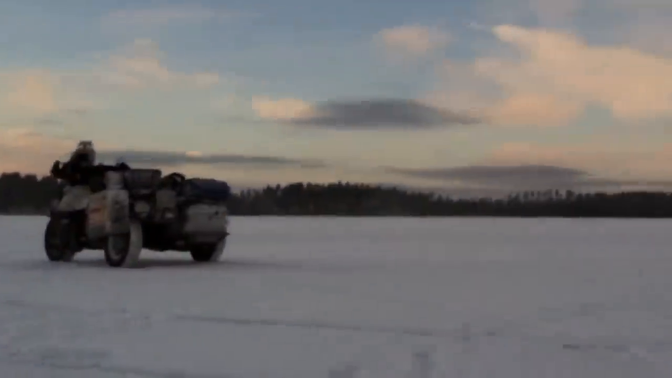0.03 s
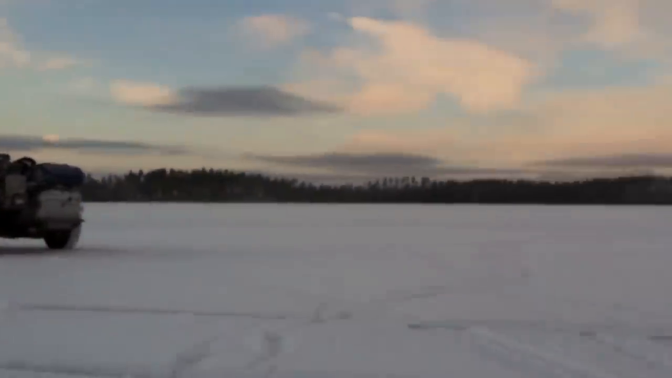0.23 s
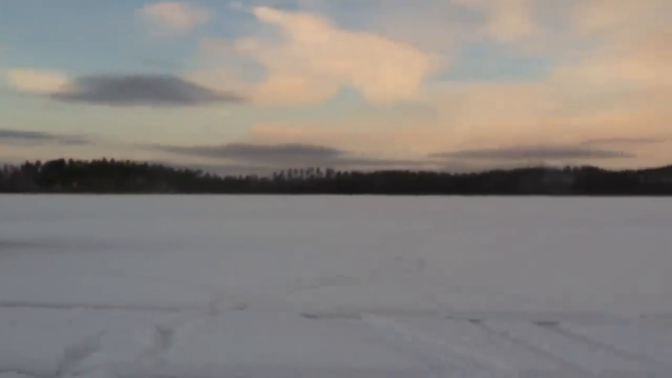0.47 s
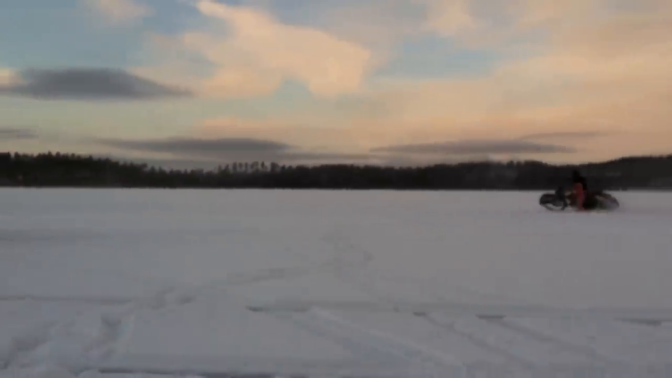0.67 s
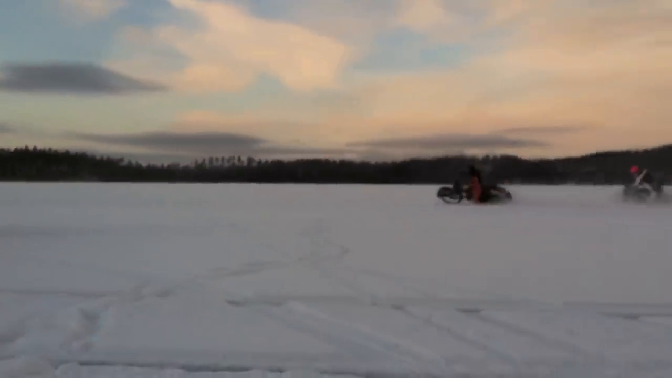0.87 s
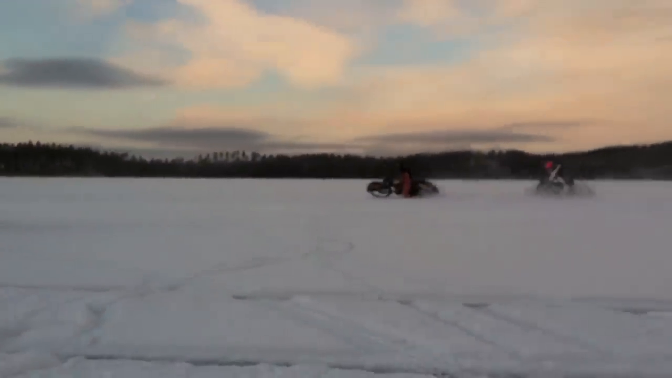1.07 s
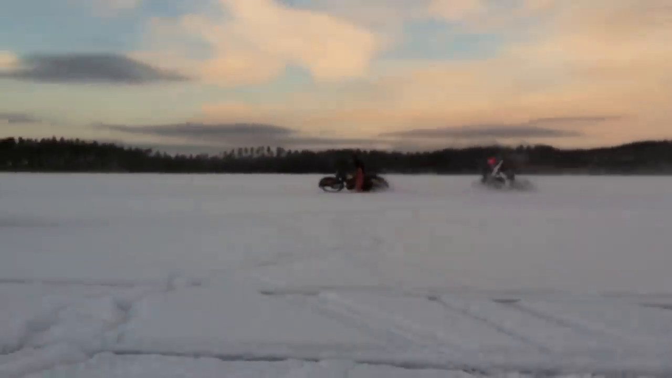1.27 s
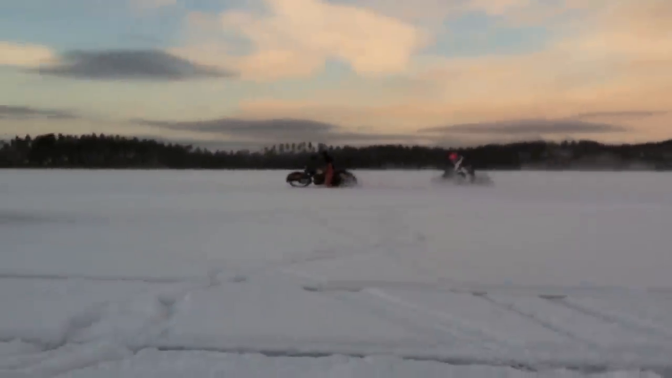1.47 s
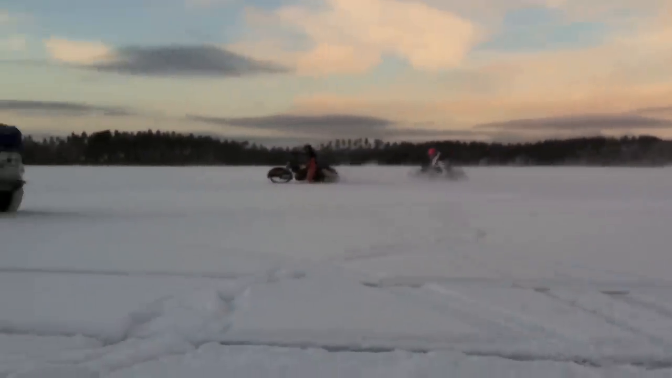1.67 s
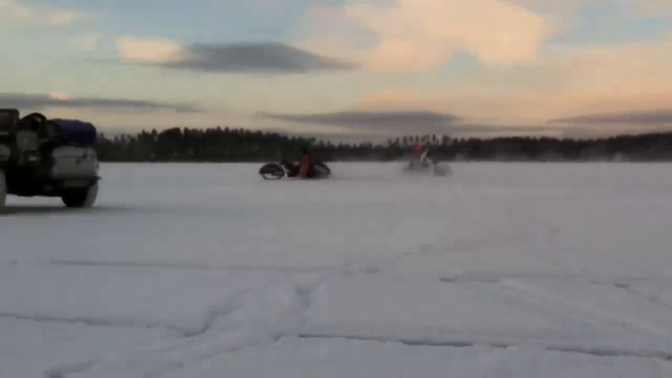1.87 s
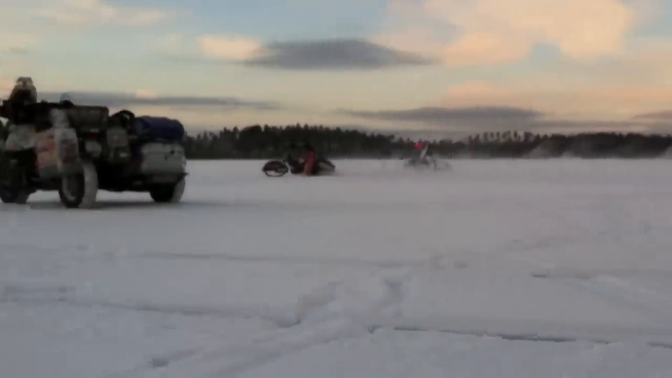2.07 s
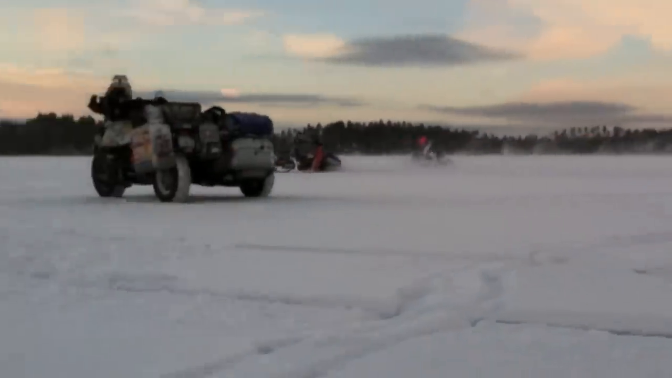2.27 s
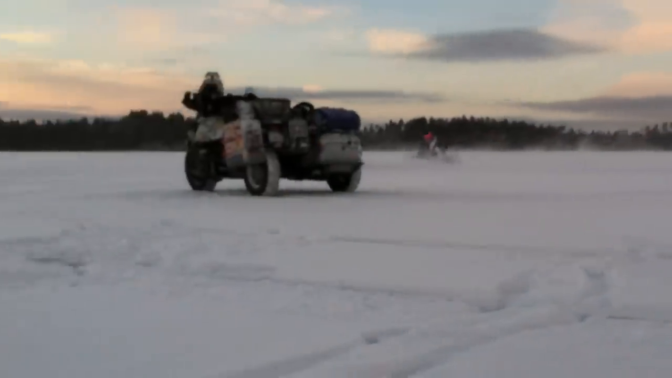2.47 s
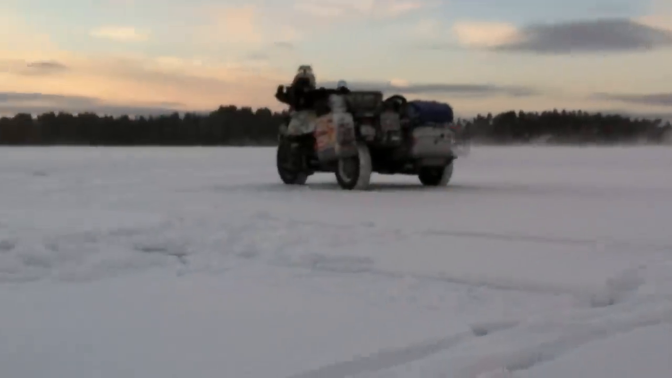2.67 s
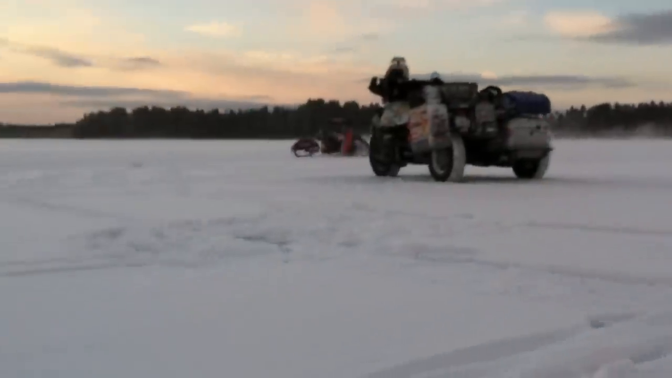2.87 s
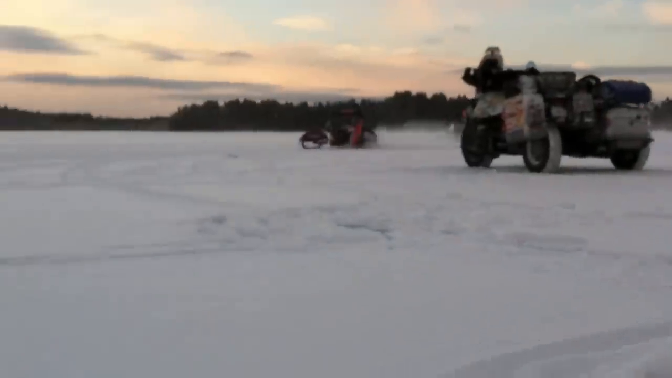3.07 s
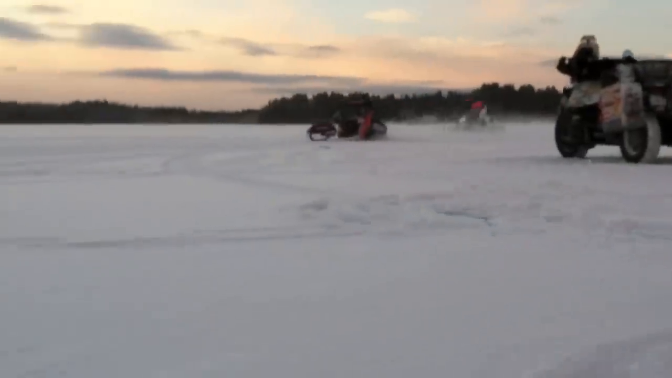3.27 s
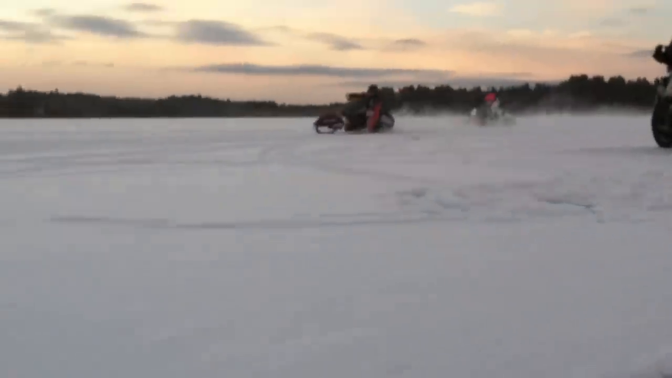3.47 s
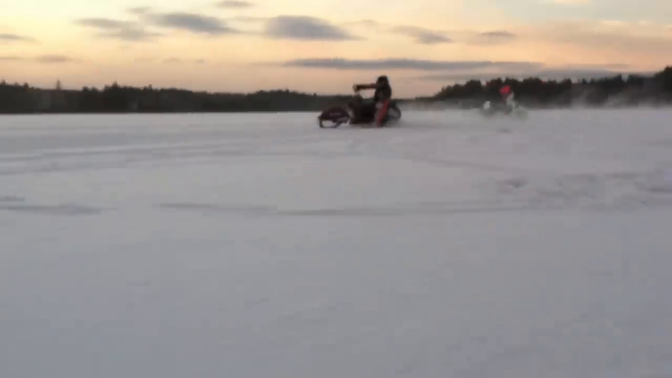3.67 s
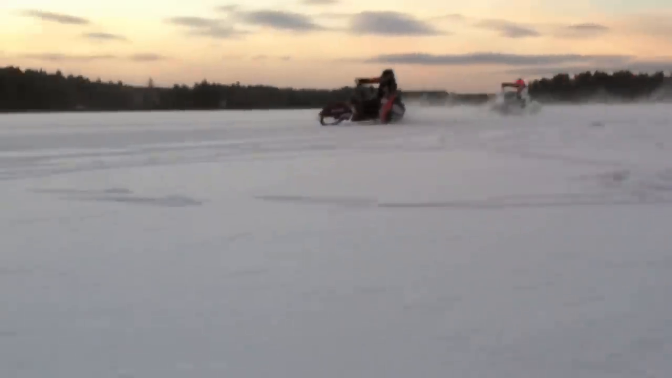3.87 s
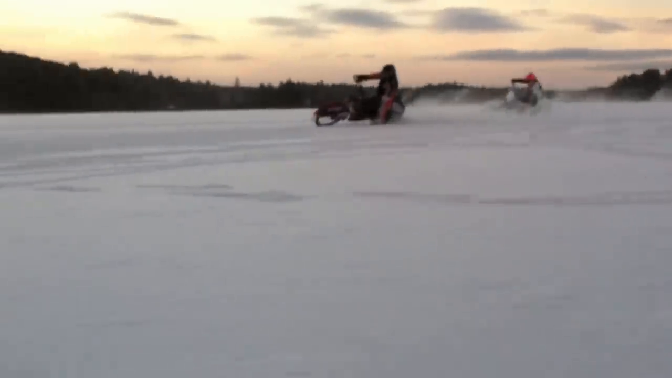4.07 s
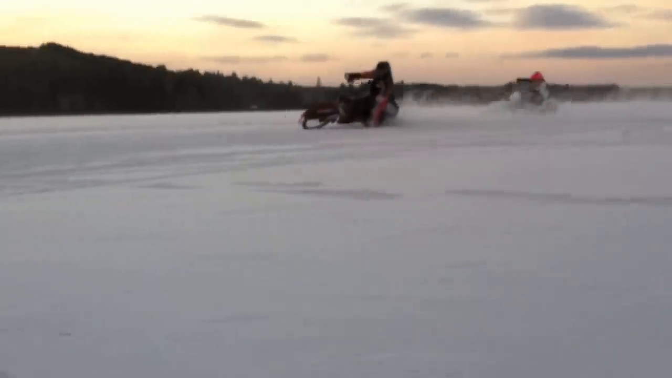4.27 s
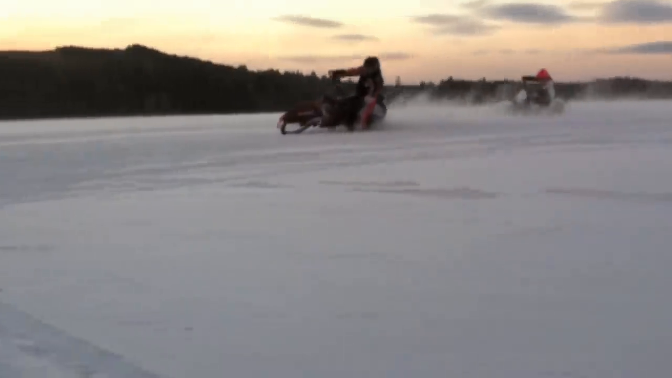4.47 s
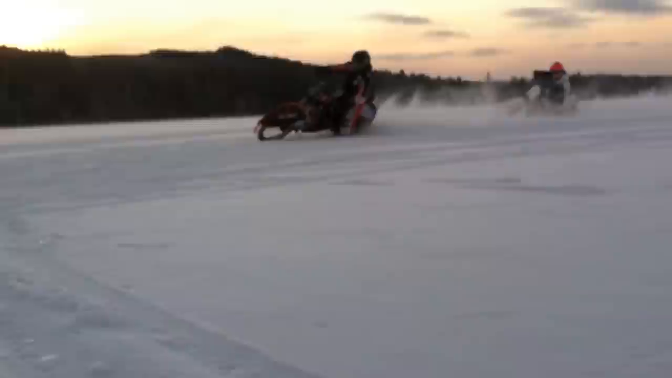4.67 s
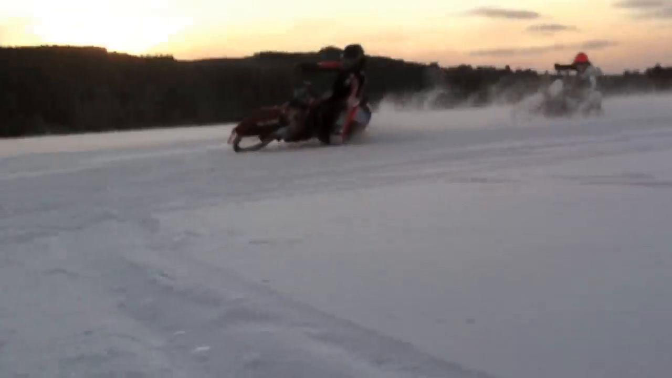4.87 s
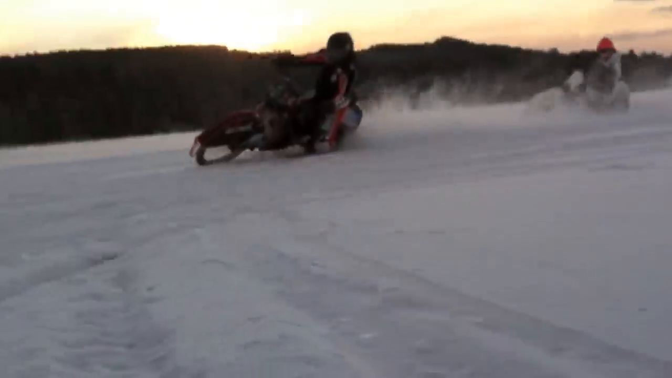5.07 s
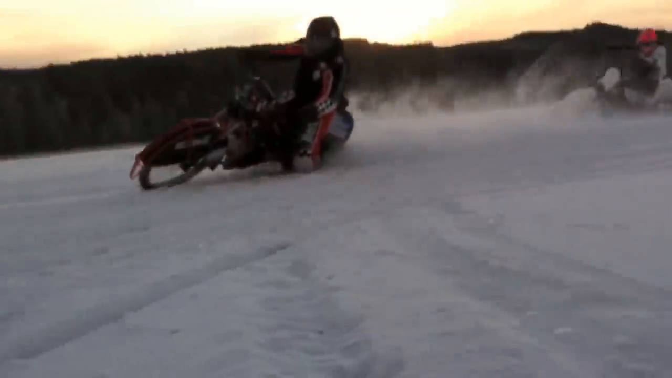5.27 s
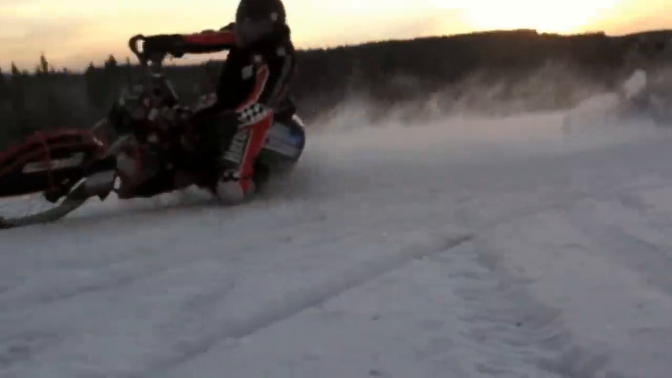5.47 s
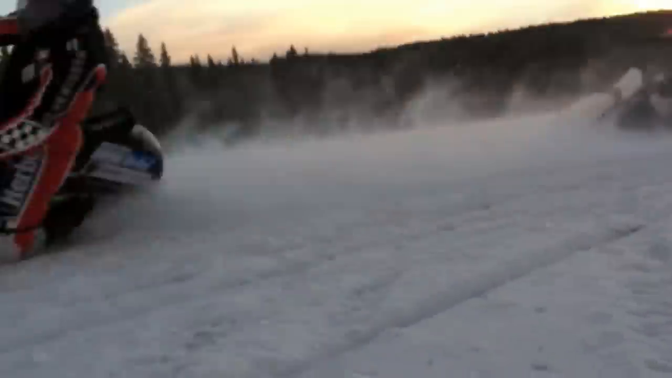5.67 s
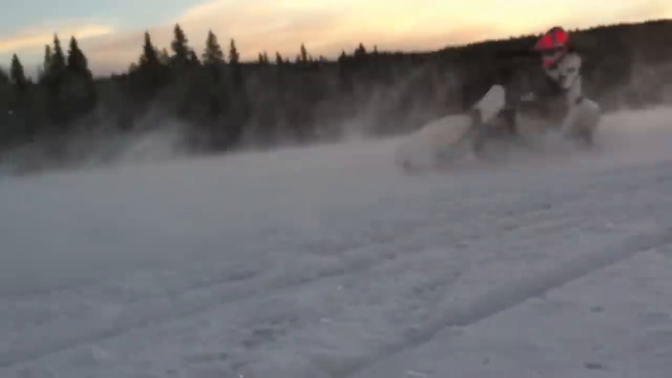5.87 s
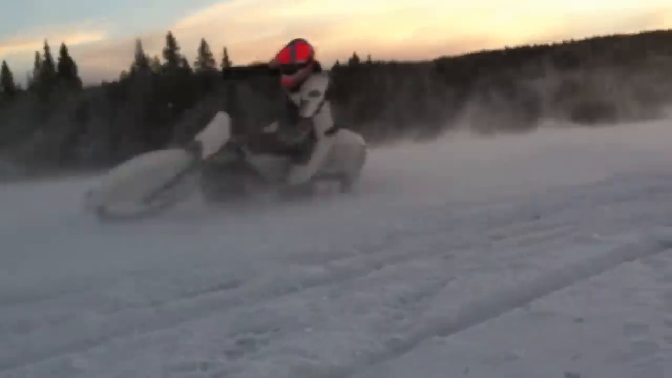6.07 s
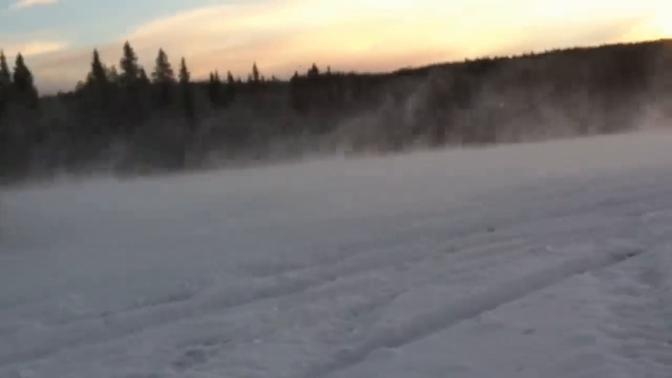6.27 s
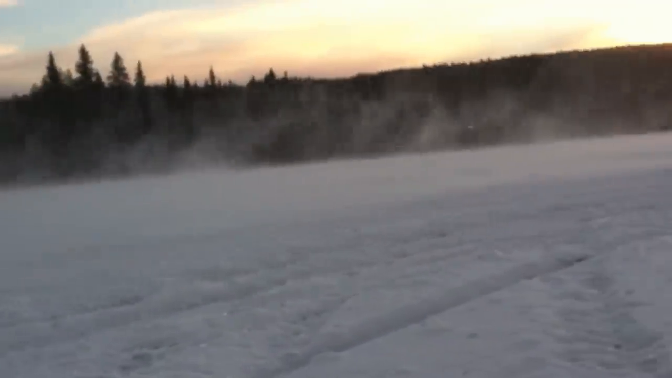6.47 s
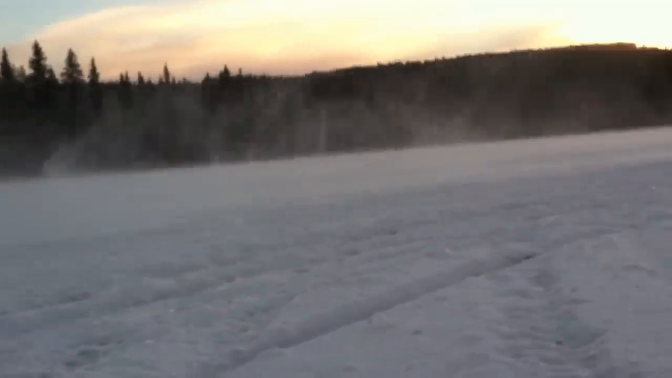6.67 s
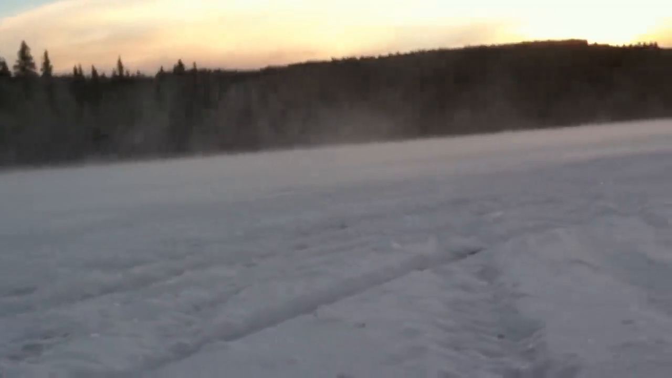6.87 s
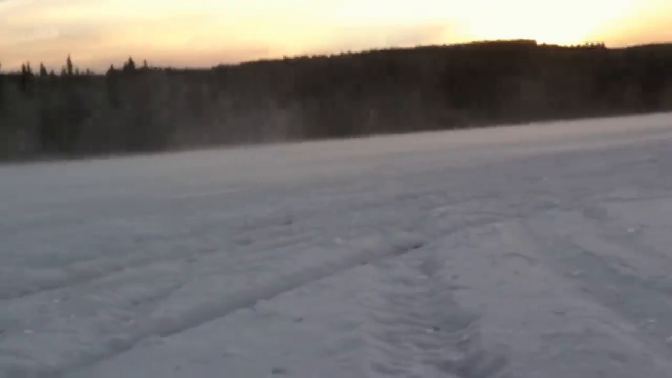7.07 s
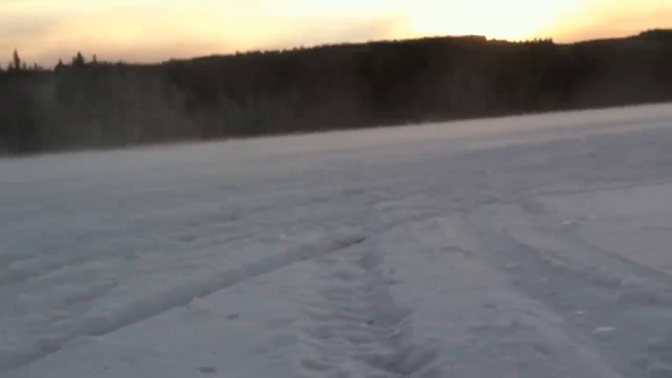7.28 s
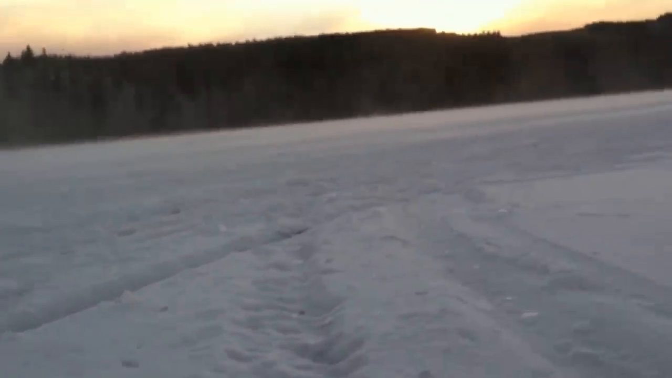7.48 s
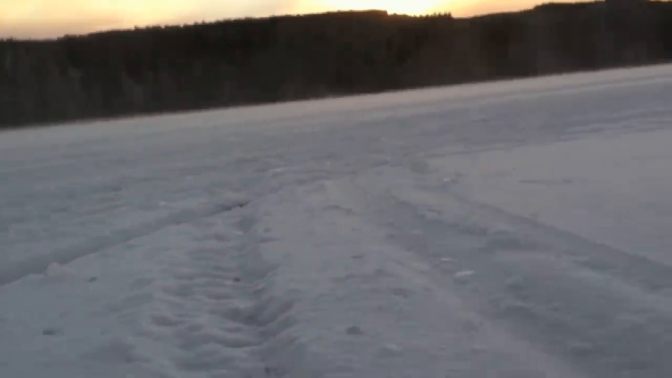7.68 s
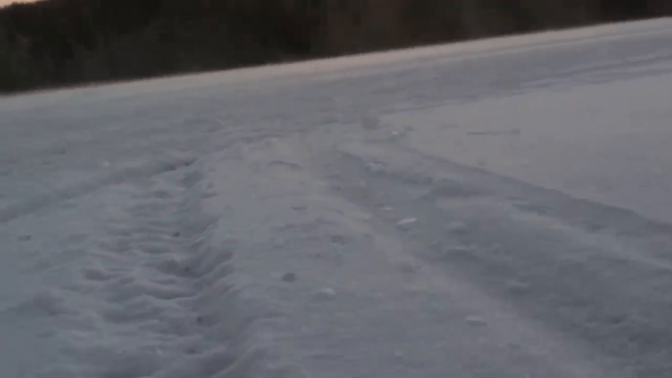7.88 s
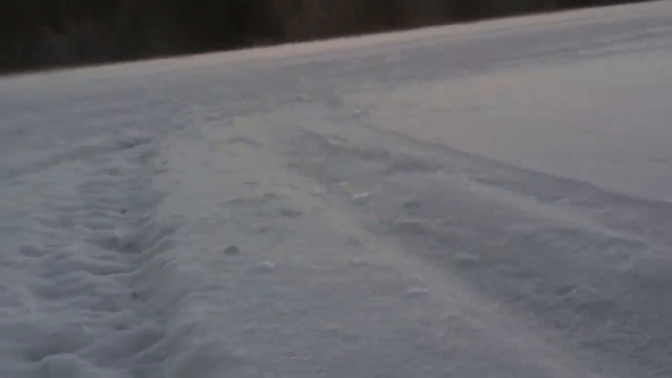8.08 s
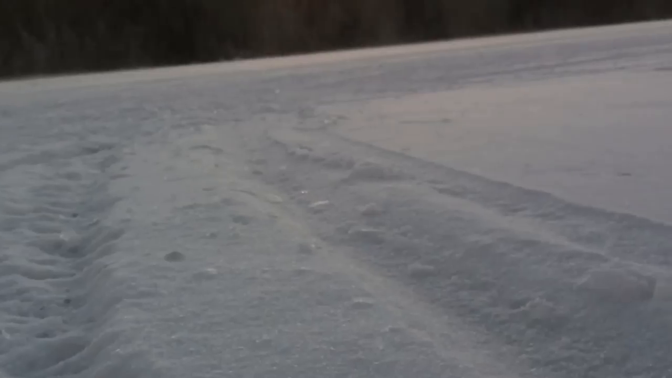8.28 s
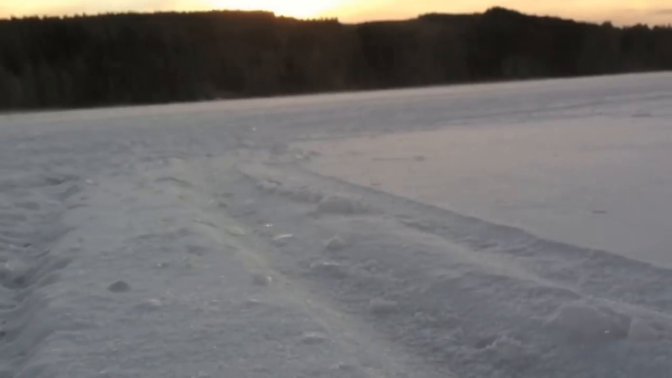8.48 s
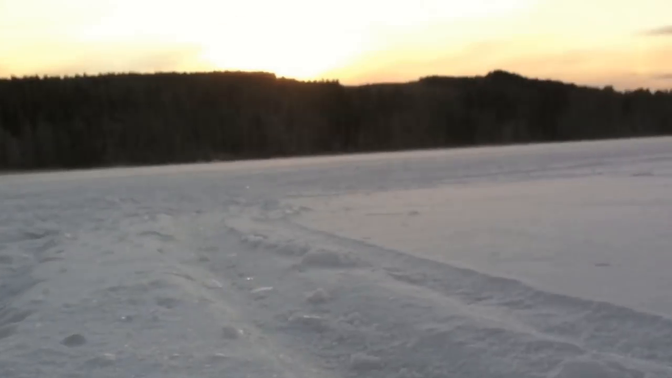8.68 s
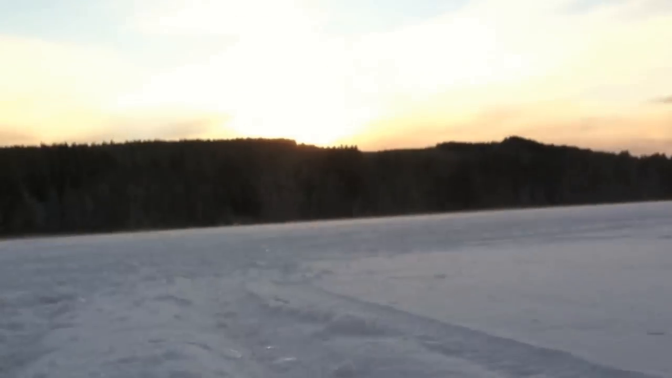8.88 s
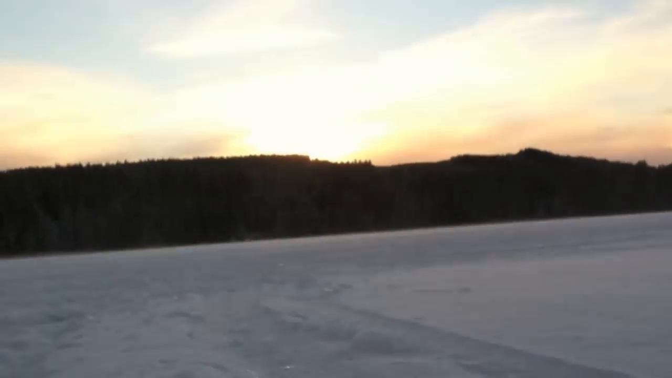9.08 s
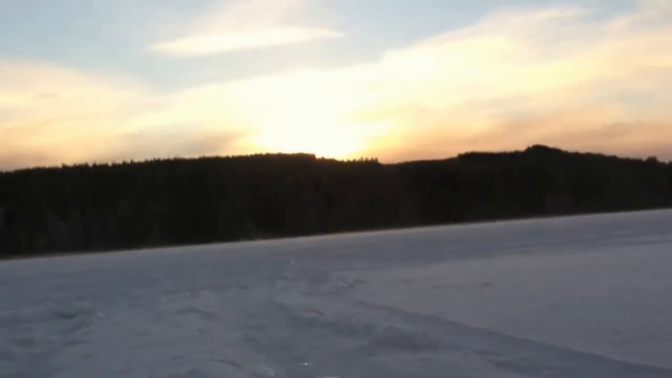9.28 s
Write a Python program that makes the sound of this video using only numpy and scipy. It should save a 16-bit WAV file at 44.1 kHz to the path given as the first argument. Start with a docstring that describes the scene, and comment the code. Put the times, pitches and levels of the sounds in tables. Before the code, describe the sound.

Two throbbing motorcycle engines approach and sweep close by, their spiked tyres throwing hissing ice, then carry on farther off.

```python
"""Two single-cylinder motorcycles drift in a circle on a frozen lake, one chasing the other.
Each firing sends a pulse through a silencer, and the two exhausts beat against each other over
the roar of their jets and a low rumble. Spiked tyres throw up hissing ice; chains and valves ring.
One microphone on the ice: the bikes pass closest near 6.0 s and 6.8 s, and chips crunch close by."""
import sys
import numpy as np
from scipy import signal
from scipy.fft import rfft, irfft, next_fast_len
from scipy.io import wavfile
from scipy.ndimage import uniform_filter1d, minimum_filter1d

SR = 44100
rng = np.random.default_rng(int(sys.argv[2]) if len(sys.argv) > 2 else 0)


def dump(signal):
    """Clip the signal to [-1, 1] and save it as 16-bit WAV at the path in sys.argv[1]."""
    limited = np.clip(np.atleast_2d(signal).T, -1, 1)
    pcm = np.round(limited * 32767).astype(np.int16)
    wavfile.write(sys.argv[1], SR, pcm)


N = 411894
TIME = np.arange(N) / SR


def gain_of(db):
    return 10 ** (np.asarray(db) / 20)


def unit_rms(x):
    return x / np.sqrt(np.mean(x ** 2) + 1e-20)


def at_hz(points, hz):
    f, value = np.transpose(points)
    return np.interp(np.log(hz + 1), np.log(f + 1), value)


def at_time(rows, t=TIME):
    times, *columns = np.transpose(rows)
    return [np.interp(t, times, column) for column in columns]


def above(hz, edge_hz, octaves):
    """Smooth step from 0 below the edge to 1 above it."""
    return 1 / (1 + (edge_hz / (hz + 1)) ** (4 / octaves))


def wander(shape, *spans):
    """Random values of unit RMS, smoothed along the first axes by the given spans."""
    x = rng.standard_normal(shape)
    for axis, span in enumerate(spans):
        x = uniform_filter1d(x, span, axis)
    return unit_rms(x)


def noise(db_field, size):
    """Noise of unit RMS, coloured by a level field (bins x frames)."""
    real, imag = rng.standard_normal(db_field.shape[::-1] + (2,)).T
    spectra = (real + 1j * imag) * gain_of(db_field)
    return unit_rms(signal.istft(spectra, nperseg=size, noverlap=size * 3 // 4)[1][:N])


def firing_count(rates, start_cycle):
    """Engine cycles run so far; each whole number is a firing."""
    return start_cycle + np.cumsum(at_time(rates)[0]) / SR


# Travel through the silencer: (frequency [Hz], relative delay [ms])
SILENCER_DELAY = [(35, 12.8), (100, 6), (165, 1), (215, -10), (280, -5), (345, 0), (400, 1), (440, -4),
                  (550, -5)]


def silencer_pulse(colour, size=8192):
    """One blow: the silencer lets some notes straight out and holds those near its resonances."""
    hz = np.fft.rfftfreq(size, 1 / SR)
    delay_s = at_hz(SILENCER_DELAY, hz) / 1000
    lag_cycles = (np.cumsum(delay_s) - delay_s / 2) * SR / size
    spectrum = gain_of(at_hz(colour, hz)) * np.exp(-2j * np.pi * lag_cycles)
    return np.fft.fftshift(irfft(spectrum, size))


def shifting_echoes(x, depth_db, slip_rad):
    """Moving over the ice shifts the echoes, so single harmonics swell, fade and slip out of step."""
    spectra = signal.stft(x, nperseg=4096, noverlap=3072)[2]
    swell, slip = wander(spectra.shape[::-1] + (2,), 14, 3).T
    spectra = spectra * gain_of(depth_db * swell) * np.exp(1j * slip_rad * slip)
    return signal.istft(spectra, nperseg=4096, noverlap=3072)[1][:N]


# Wheelspin and full throttle roughen the firing as the bikes near: (time [s], puffs over blows [dB])
TURBULENCE = [(0, -15), (3.5, -15.5), (4.8, -13.5), (5.6, -10.5), (6.9, -11), (7.4, -14), (8.4, -15),
              (9.34, -17)]


def exhaust(engine, levels, colour, jitter_ms=.1, uneven_db=1.1, puff_cycles=.6):
    """An uneven blow and a turbulent puff per firing; the bands shift with pipe angle and throttle."""
    cycles = firing_count(*engine)
    firings = np.flatnonzero(np.diff(np.floor(cycles)))
    timing, strength = rng.standard_normal((500, 2))[:len(firings)].T
    firings += np.round(jitter_ms * SR / 1000 * timing).astype(int)
    blows = np.zeros(N)
    blows[np.clip(firings, 0, N - 1)] = gain_of(uneven_db * strength)
    puffs = np.exp(-(cycles % 1) / puff_cycles) * rng.standard_normal(N)
    drive = unit_rms(blows) + gain_of(at_time(TURBULENCE)[0]) * unit_rms(puffs)
    tailpipe = signal.oaconvolve(drive, silencer_pulse(colour), "same")
    size = next_fast_len(N + 4096)
    spectrum = rfft(shifting_echoes(tailpipe, depth_db=1.7, slip_rad=.55), size)
    hz = np.fft.rfftfreq(size, 1 / SR)
    # Five bands from low to high: thump, growl, bark, rasp, snarl.
    growl_up, bark_up = above(hz, 203, 0.02), above(hz, 260.2, 0.074)
    rasp_up, snarl_up = above(hz, 422.5, 0.1), above(hz, 622, 0.1)
    masks = (1 - growl_up, growl_up - bark_up, bark_up - rasp_up, rasp_up - snarl_up, snarl_up)
    bands = [unit_rms(irfft(spectrum * mask, size)[:N]) for mask in masks]
    thump_db, growl_db, bark_db, rasp_db = at_time(levels)
    snarl_db = rasp_db + 15.5 + 1.03 * (thump_db + rasp_db)  # grows faster than the rasp
    lifts_db = (0, growl_db, bark_db, rasp_db, snarl_db)
    return sum(gain_of(thump_db + db) * band for db, band in zip(lifts_db, bands))


# Lead engine speed, heard from the microphone: (time [s], firing rate [Hz])
LEAD_RATE = [(0.0, 32.6), (0.6, 32.58), (0.8, 33.12), (2.4, 35.1), (2.7, 34.9), (3.3, 35.18), (3.7, 35.27),
             (4.7, 36.11), (5.6, 36.11), (5.85, 36.08), (6.1, 34.84), (6.4, 33.98), (7.4, 33.73),
             (8.2, 34.19), (8.45, 33.37), (8.6, 31.68), (9.34, 27.9)]
LEAD_ENGINE = (LEAD_RATE, .486)  # with its starting phase [cycles]
# One lead pulse after silencer and microphone: (frequency [Hz], level [dB])
LEAD_COLOUR = [(35, -56), (72, -37), (108, -14), (143, 5), (180, -6), (220, -5), (280, -8.5), (322, -6),
               (385, -17.5), (470, -10.5), (570, -24), (700, -63), (1500, -79), (4000, -110)]
# Lead exhaust at the microphone: (time [s], thump [dB], growl, bark, rasp [dB over thump])
LEAD_LEVELS = [(0, -23, -16, -0.5, -26), (0.5, -20, -25, -12, -33), (1.6, -23.5, -10.5, -10, -28),
               (2.4, -24.5, -9.5, -12, -49), (3.4, -23, -13.5, -17, -20.5), (4.2, -22, -25.5, -3.5, -18),
               (5.0, -17, -4.5, -8.5, -17), (5.6, -9, -31, -2, -15.5), (6.0, -8.5, -10, -9, -14),
               (6.4, -17.5, -7, 0, -11.5), (6.9, -19, -10, -10, -16), (8.0, -23, -12, -3, -21.5),
               (8.6, -30, -19, -9, -30), (9.2, -38, 0, -6, -24), (9.34, -24, -10, -5.5, -21)]


def lead_bike():
    """The slower-firing exhaust in front, loudest as it passes the microphone near 6 s."""
    return exhaust(LEAD_ENGINE, LEAD_LEVELS, LEAD_COLOUR)


# Chasing engine speed, heard from the microphone: (time [s], firing rate [Hz])
CHASER_RATE = [(0.0, 40.91), (0.6, 40.62), (1.3, 40.45), (2.22, 43.34), (2.42, 41.84), (2.7, 40.81),
               (3.25, 39.97), (3.6, 40.27), (4.25, 39.61), (4.5, 39.91), (4.8, 41.16), (5.4, 43.01),
               (5.8, 41.51), (6.2, 39.49), (6.6, 38.05), (7.0, 37.24), (7.2, 36.32), (7.6, 35.78),
               (8.0, 36.68), (8.5, 36.61), (8.85, 38.32), (9.2, 41.27), (9.34, 40.65)]
CHASER_ENGINE = (CHASER_RATE, .833)  # with its starting phase [cycles]
# One chaser pulse after silencer and microphone: (frequency [Hz], level [dB])
CHASER_COLOUR = [(35, -65), (72, -42), (110, -17.5), (150, 0.5), (190, -6), (230, -7.5), (285, -9),
                 (325, -4), (395, -20.5), (470, -8.5), (570, -31), (700, -60.5), (1500, -87), (4000, -110)]
# Chasing exhaust at the microphone: (time [s], thump [dB], growl, bark, rasp [dB over thump])
CHASER_LEVELS = [(0, -27, -1, -8, -13), (0.5, -28.5, 1, -5.5, -17), (1.6, -29, -14, -1, -14.5),
                 (2.2, -26.5, -21, -3.5, -25.5), (2.5, -26.5, -10, -10, -28), (3.3, -25.5, -13, -3.5, -23),
                 (4.2, -22.5, -9, -7.5, -14.5), (4.8, -19, -13, -12, -14.5), (5.3, -17, -2, -4, -5),
                 (6.2, -18, -2.5, -35, -14.5), (6.85, -14.5, -7.5, 2, -11.5), (7.5, -19.5, -12, -6, -20.5),
                 (8.0, -17, -11.5, -2.5, -19), (8.5, -20.5, -10.5, -7.5, -21.5),
                 (8.9, -20, -3.5, -6.5, -13.5), (9.221, -24, 0.5, 0, -8), (9.27, -28.5, -1, -5, -10),
                 (9.34, -43, -17, 3, -16)]


def chasing_bike():
    """The faster-firing exhaust, passing the microphone just under a second behind."""
    return exhaust(CHASER_ENGINE, CHASER_LEVELS, CHASER_COLOUR)


# Closest to the microphone: (time [s], half length [s], lift [dB])
CLOSE_PASSES = [(6.046, 0.3, 14), (6.767, 0.23, 7)]


def pass_lift_db(t):
    """The swell as each bike and its spray cloud sweep by."""
    return sum(db / (1 + ((t - when) / half) ** 2) for when, half, db in CLOSE_PASSES)


# Exhaust jets across the lake, before the lift of the passes: (time [s], level [dB])
ROAR_LEVEL = [(0, -52), (0.7, -60), (1.6, -55.5), (4.6, -59), (5.4, -52), (6.9, -51.5), (7.8, -59.5),
              (8.55, -46), (8.8, -52), (9.0, -46.5), (9.34, -42)]
# Their mid-range colour: (frequency [Hz], level [dB])
ROAR_SPECTRUM = [(350, -17), (600, -2.5), (800, -2), (1100, -5), (1500, -16.5), (2500, -61)]


def jet_roar(throb):
    """The turbulent exhaust jets rush, swelling after each firing of either engine."""
    hz = np.fft.rfftfreq(1024, 1 / SR)
    rush = noise(at_hz(ROAR_SPECTRUM, hz)[:, None] * np.ones(N // 256 + 5), size=1024)
    swell = sum(np.maximum(np.sin(2 * np.pi * firing_count(*engine)), 0) ** 2
                for engine in (LEAD_ENGINE, CHASER_ENGINE))
    level_db = at_time(ROAR_LEVEL)[0] + 1.22 * pass_lift_db(TIME)
    return gain_of(level_db) * unit_rms(rush * (1 + throb * swell))


# Four rings of chain and valve metal: (frequency [Hz], width [Hz])
METAL_RINGS = [(3750, 45), (4130, 40), (4830, 35), (5600, 60)]
# The rings on the way past the microphone:
# (time [s], pitch of the lower three [ratio], pitch of the top one [ratio], four ring levels [dB])
RING_MOTION = [(0, .99, .992, 3, 1, -3, 8), (1.0, .995, .995, 1, 2, 0, 8), (1.5, 1, 1, 8, 3, 6, 5),
               (2.0, .995, 1.002, 8, 3, 8, 7), (2.6, 1.005, 1.002, 1, -4, 5, 2),
               (3.2, 1.017, 1.025, 6, 5, -2, 2), (4.2, 1.022, 1.038, 5, 5, -5, 7),
               (4.7, 1.028, 1.04, 6, 4, -5, 2), (5.2, 1.032, 1.04, 7, 6, -5, 6),
               (5.7, 1.024, 1.036, 7, 6, -5, 2), (6.15, .993, 1.032, 8, 3, -2, 4),
               (6.6, .987, 1.015, 6, 0, 4, 5), (7.2, .975, .998, 5, 1, -3, 8),
               (7.8, .975, .995, 3, -3, -3, 4)]


def rattle_db(hz, t):
    """Chains and valves ring as fluttering peaks in the hiss, higher on approach, lower in retreat."""
    shift, top_shift, *levels_db = at_time(RING_MOTION, t)
    shifts = (shift, shift, shift, top_shift)
    flutters_db = 2.2 + 1.2 * wander((len(t), len(METAL_RINGS)), 22).T
    power = sum(gain_of(db + flutter) ** 2 / (1 + (2 * (hz - centre * pitch) / width) ** 2)
                for (centre, width), db, flutter, pitch in zip(METAL_RINGS, levels_db, flutters_db, shifts))
    return 10 * np.log10(1 + power)


# Spray and rattle at the microphone: (time [s], level [dB])
SPRAY_LEVEL = [(0, -39.5), (0.2, -39.5), (0.34, -33), (0.56, -39), (1.05, -35), (1.2, -38), (2.05, -30),
               (2.55, -38), (2.68, -32.5), (2.88, -44), (3.0, -36.5), (4.05, -27), (4.6, -27.5), (5.2, -19),
               (5.57, -12.5), (6.02, -18.5), (6.32, -25), (6.55, -20), (6.92, -20.5), (7.05, -28),
               (7.25, -35.5), (7.45, -51), (7.8, -56), (8.05, -49.5), (8.3, -50), (8.49, -46.5),
               (8.52, -40.5), (8.61, -44), (8.635, -51.5), (8.73, -49.5), (8.78, -55), (8.95, -53.5),
               (9.02, -55), (9.21, -52.5), (9.24, -57.5), (9.34, -60)]
# Colour of the flying ice: (frequency [Hz], level [dB])
SPRAY_SPECTRUM = [(500, -6.5), (800, -24.5), (1400, -7), (2200, -6), (3200, -6), (4500, -3.5), (6000, -7.5),
                  (7500, -14), (11700, -24.5), (13200, -37), (15600, -49)]
# Its treble above 7 kHz: (time [s], lift [dB])
SPRAY_TREBLE = [(0, -1.5), (3, 0), (5.6, -4), (6.05, 5.5), (6.35, -0.5), (6.85, 3), (7.1, -3), (7.6, 1),
                (8.4, 3), (8.55, 3), (8.7, 3.5), (9.34, 1)]


def ice_spray(patchy_db, gusty_db, throb, grain_db, grains_per_s):
    """Spiked tyres throw up a patchy, grainy hiss that carries the rattle and throbs with the firings."""
    frames, hz = N // 256 + 5, np.fft.rfftfreq(1024, 1 / SR)[:, None]
    t = np.arange(frames) * 256 / SR
    level_db, treble_db, pass_db = at_time(SPRAY_LEVEL, t)[0], at_time(SPRAY_TREBLE, t)[0], pass_lift_db(t)
    low_floor = gain_of(-41 - level_db)  # keeps some low hiss as the spray fades
    low_db = 10 * np.log10(gain_of(pass_db - 7) ** 2 + low_floor ** 2)
    tilt_db = (1 - above(hz, 2610, 1.0)) * low_db + above(hz, 7000, 0.27) * treble_db
    tilt_db += above(hz, 13000, 0.2) * 0.63 * pass_db
    patches = wander((frames, len(hz)), 8, 10).T
    gusts = wander(frames, 7)  # thrown lumps brighten all bands at once
    colour_db = at_hz(SPRAY_SPECTRUM, hz) + rattle_db(hz, t) + tilt_db
    hiss = noise(colour_db + patchy_db * patches + gusty_db * gusts, size=1024)
    beat = sum(np.cos(2 * np.pi * firing_count(*engine)) for engine in (LEAD_ENGINE, CHASER_ENGINE))
    grain_sizes = gain_of(2.6 * np.minimum(rng.exponential(1, N), 3))
    grains = grain_sizes * (rng.random(N) < grains_per_s / SR)
    bursts = signal.oaconvolve(grains, signal.windows.hann(220))[:N]  # each lifts the hiss for 5 ms
    envelope = 1 + throb * beat + gain_of(grain_db) * bursts
    return gain_of(np.interp(TIME, t, level_db)) * unit_rms(hiss * envelope)


# Rumble at the microphone: (time [s], level [dB])
RUMBLE_LEVEL = [(0, -58), (3.3, -57), (4.2, -52), (5.7, -56), (6.3, -62), (6.9, -62), (7.3, -63),
                (8.4, -52), (9.34, -46)]
# Its colour: (frequency [Hz], level [dB])
RUMBLE_SPECTRUM = [(15, -15), (49, -26), (75, 6.5), (90, -11)]


def low_rumble():
    """Deep noise under the engines, falling away above about 110 Hz."""
    hz = np.fft.rfftfreq(4096, 1 / SR)
    colour_db = at_hz(RUMBLE_SPECTRUM, hz) - 40 * above(hz, 110, 0.57)
    rumble = noise(colour_db[:, None] * np.ones(N // 1024 + 5), size=4096)
    return gain_of(at_time(RUMBLE_LEVEL)[0]) * rumble


# Ice close to the microphone:
# (time [s], onset level [dB], centre [Hz], width [octaves], time to fall 60 dB [s])
ICE_CHIPS = [(2.955, -44, 600, 2.9, 0.027), (4.18, -41, 900, 0.7, .03), (5.803, -9.5, 3740, 1.56, 0.044),
             (6.041, -16, 1600, 2.9, 0.082), (6.71, -27, 5500, 1.4, 0.018), (6.775, -24, 5000, 1.6, 0.02),
             (6.825, -23, 6500, .8, 0.013), (7.231, -24, 3680, 0.84, 0.011), (7.39, -50, 4460, 1.3, .03),
             (7.925, -39, 930, 1.3, 0.019), (8.026, -45, 1050, 0.75, 0.023), (8.189, -49, 950, 1.5, 0.027),
             (8.478, -43, 900, 0.69, .03), (8.512, -45, 2300, 1.9, 0.3), (8.609, -48, 2500, 2.4, .03),
             (8.674, -40, 795, 0.67, 0.024), (8.748, -41.5, 3000, 2.2, 0.045),
             (8.835, -38, 1180, 2.5, 0.026), (8.839, -53, 7000, 1.2, .025), (8.958, -47, 3200, 2, 0.15),
             (9.101, -45, 1800, 3, 0.086), (9.203, -38.5, 1170, 1.2, 0.036)]


def ice_chips(length=4000, attack_s=.0015):
    """Each chip or crunch is a short, decaying burst of noise in its own band."""
    out, t = np.zeros(N + length), np.arange(length) / SR
    for when, db, hz, octaves, t60 in ICE_CHIPS:
        spread = 2 ** (octaves / 2)
        band = signal.butter(3, [hz / spread, min(hz * spread, 15000)], "bandpass", fs=SR)
        envelope = gain_of(-60 * t / t60) * np.minimum(t / attack_s, 1)
        burst = signal.lfilter(*band, rng.standard_normal(length) * envelope)
        onset_rms = np.sqrt(np.mean(burst[:250] ** 2))
        out[round(when * SR):][:length] += gain_of(db) * burst / onset_rms
    return out[:N]


def scene():
    """Both bikes and the ice they throw, in mono from one spot on the lake."""
    bikes = lead_bike() + chasing_bike()
    spray = ice_spray(patchy_db=1.5, gusty_db=.9, throb=.08, grain_db=-15, grains_per_s=60)
    return (bikes + jet_roar(throb=0.3) + spray + ice_chips() + low_rumble())[None]


def record(dry):
    """Behind the microphone, a quick limiter holds down the loudest beats; bass and top are trimmed."""
    threshold_db, squeeze, window = -6.5, .7, 700
    peak_db = 20 * np.log10(-minimum_filter1d(-abs(dry[0]), window) + 1e-9)
    over_db = uniform_filter1d(np.maximum(peak_db - threshold_db, 0), window)
    limited = dry / gain_of(squeeze * over_db)
    bass_cut = signal.lfilter(*signal.butter(1, 45, "highpass", fs=SR), limited)
    lowpass = signal.firwin(511, 15700, window=("kaiser", 9), fs=SR)
    return signal.oaconvolve(bass_cut, lowpass[None], "same")


dry = scene()
out = record(dry)
dump(out)
```